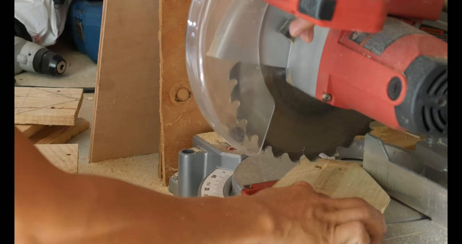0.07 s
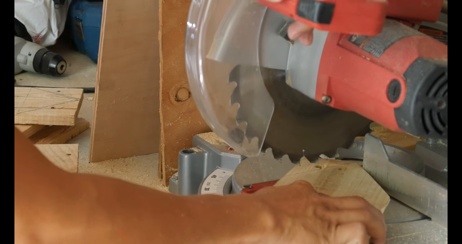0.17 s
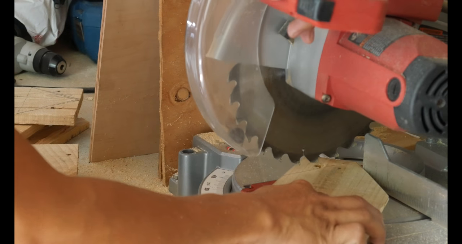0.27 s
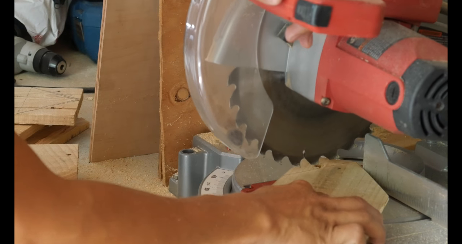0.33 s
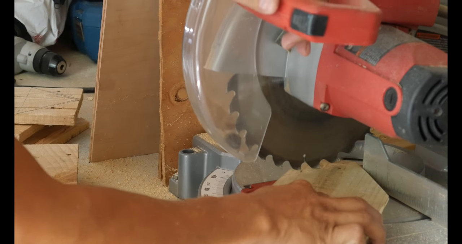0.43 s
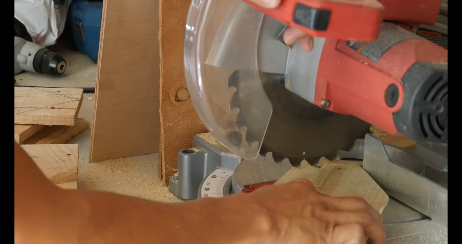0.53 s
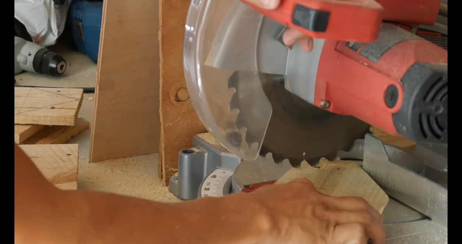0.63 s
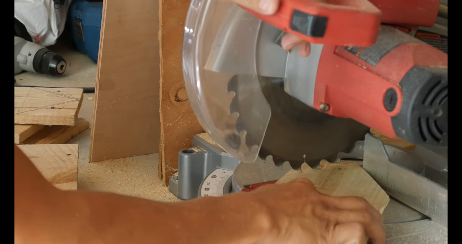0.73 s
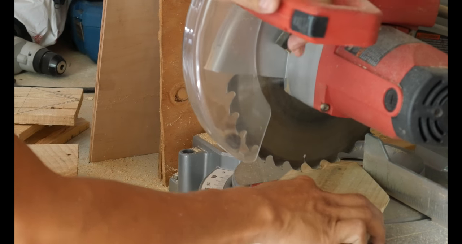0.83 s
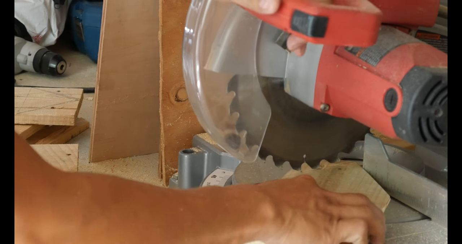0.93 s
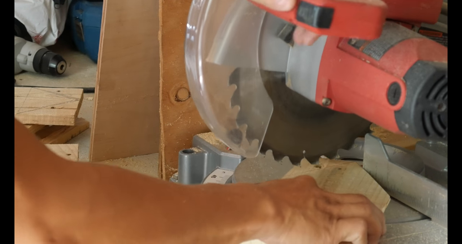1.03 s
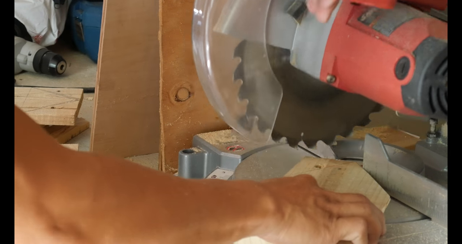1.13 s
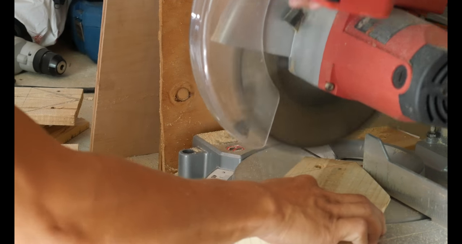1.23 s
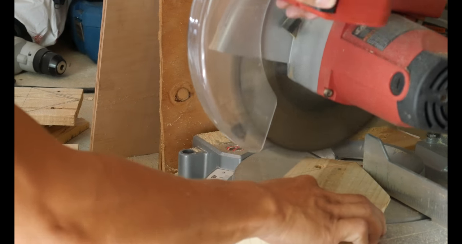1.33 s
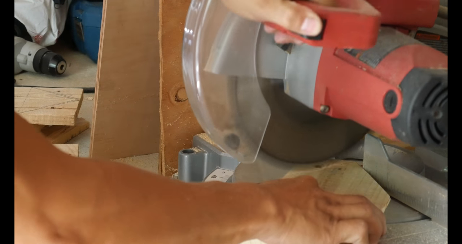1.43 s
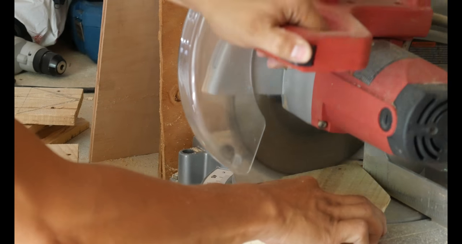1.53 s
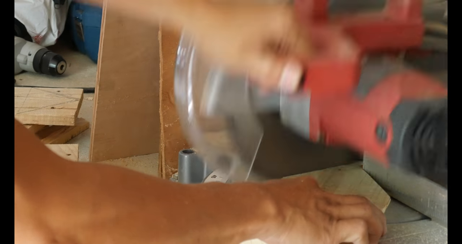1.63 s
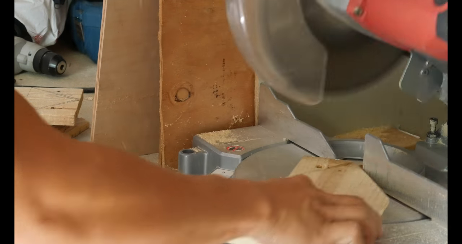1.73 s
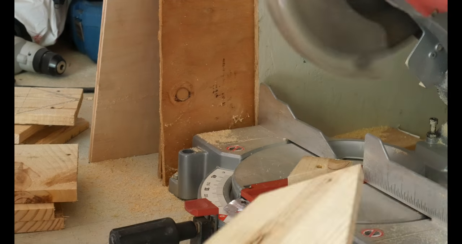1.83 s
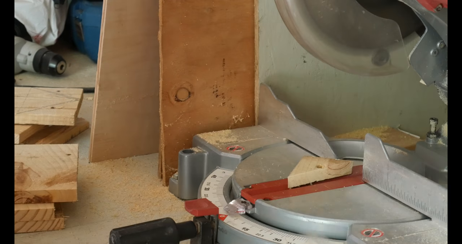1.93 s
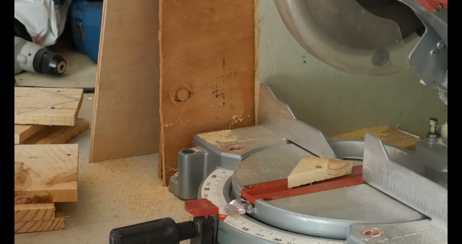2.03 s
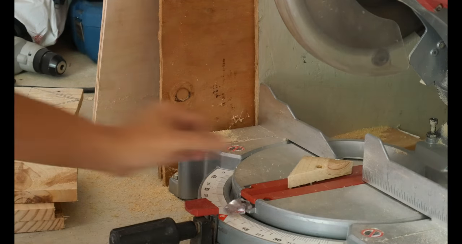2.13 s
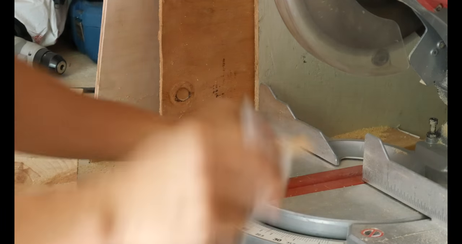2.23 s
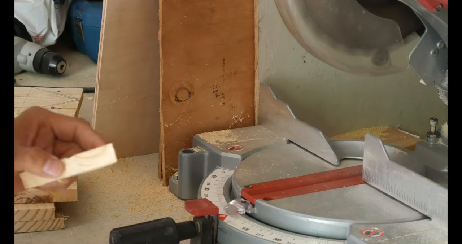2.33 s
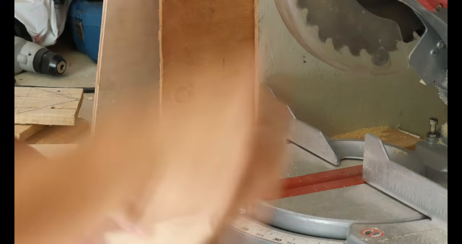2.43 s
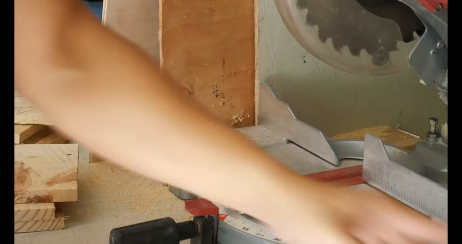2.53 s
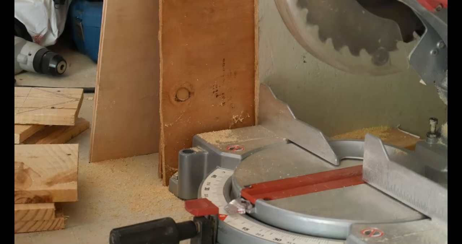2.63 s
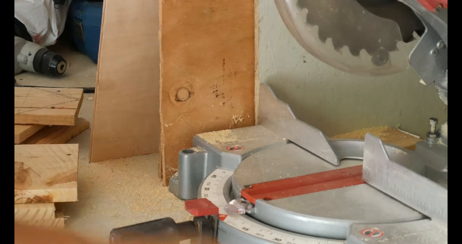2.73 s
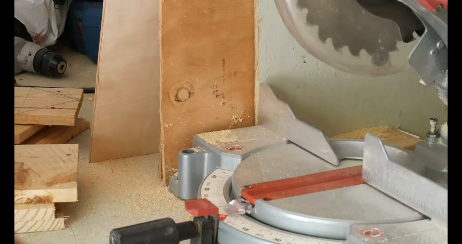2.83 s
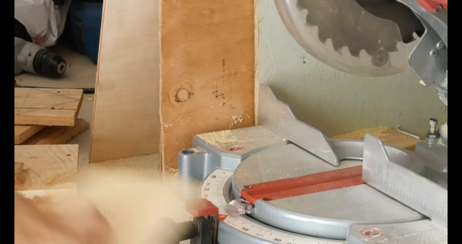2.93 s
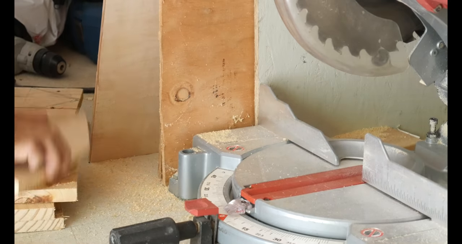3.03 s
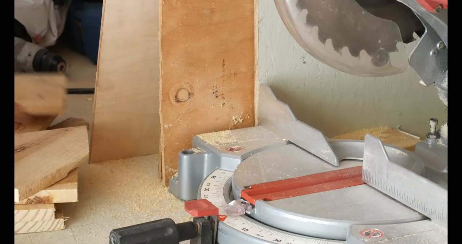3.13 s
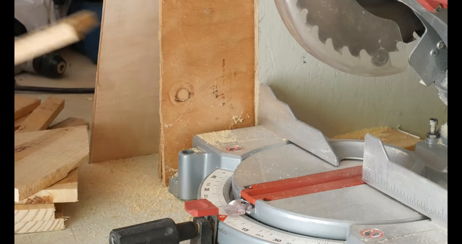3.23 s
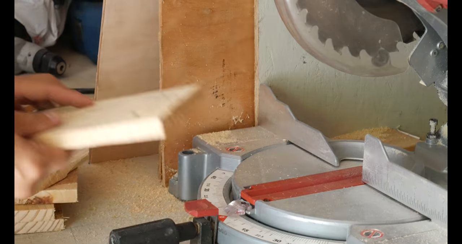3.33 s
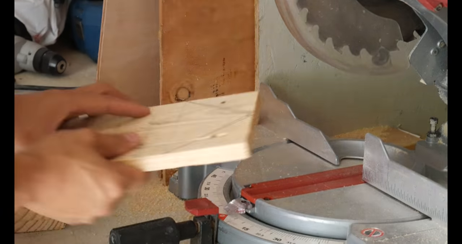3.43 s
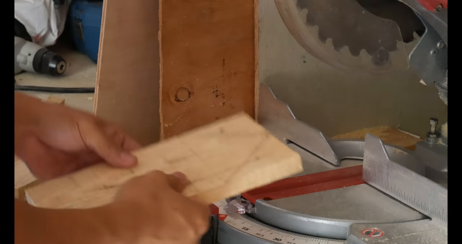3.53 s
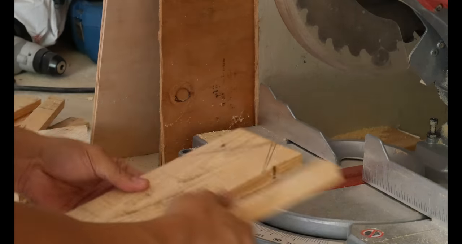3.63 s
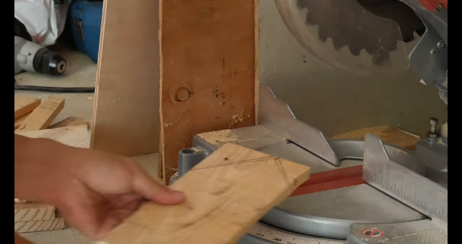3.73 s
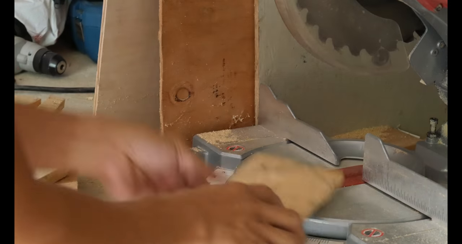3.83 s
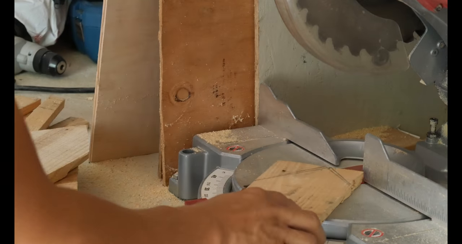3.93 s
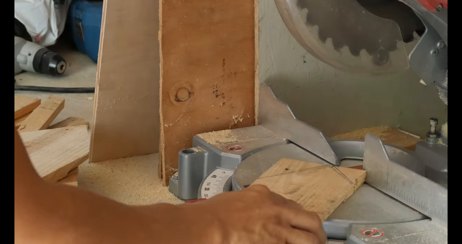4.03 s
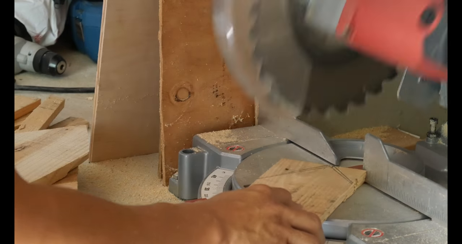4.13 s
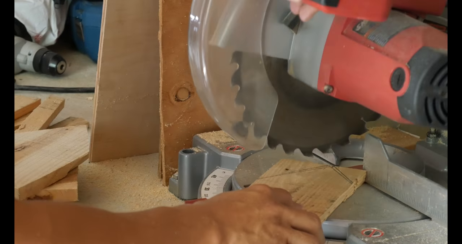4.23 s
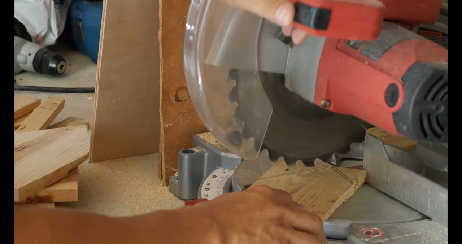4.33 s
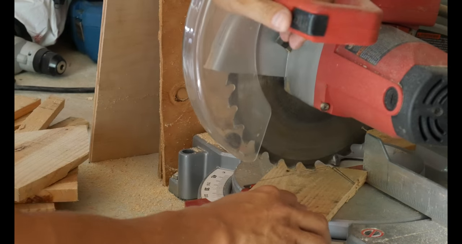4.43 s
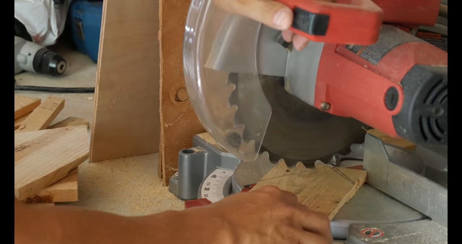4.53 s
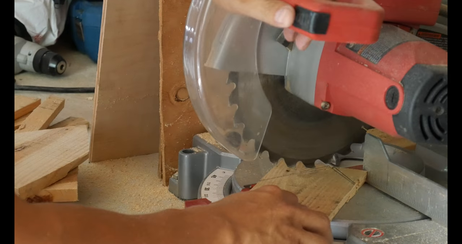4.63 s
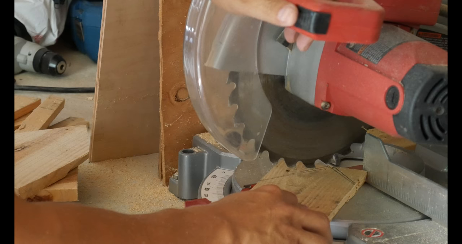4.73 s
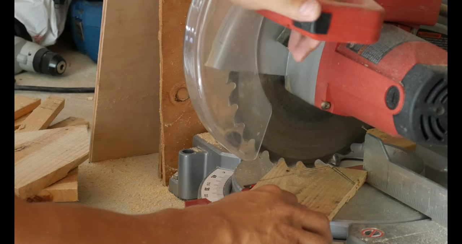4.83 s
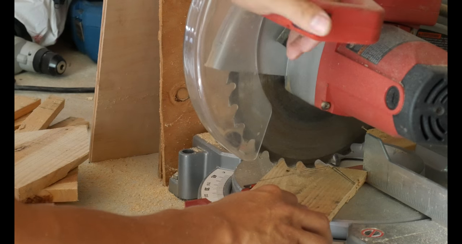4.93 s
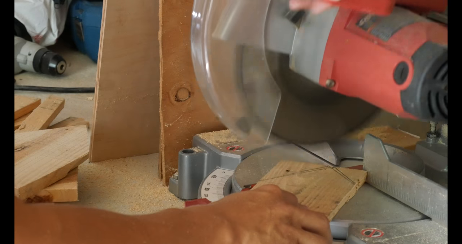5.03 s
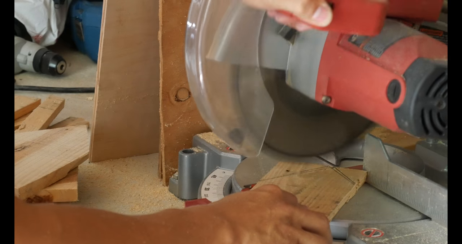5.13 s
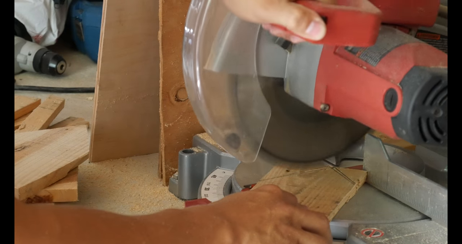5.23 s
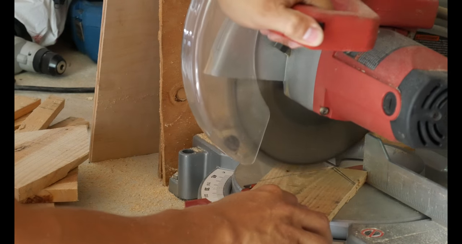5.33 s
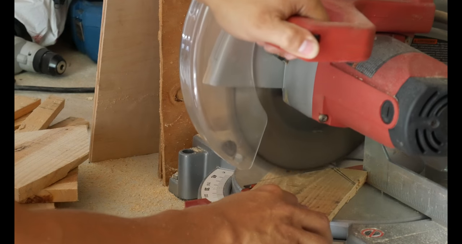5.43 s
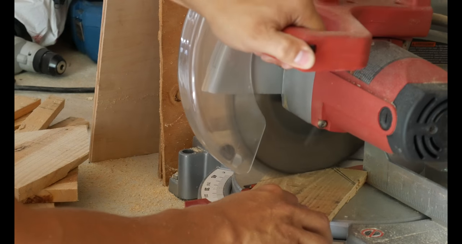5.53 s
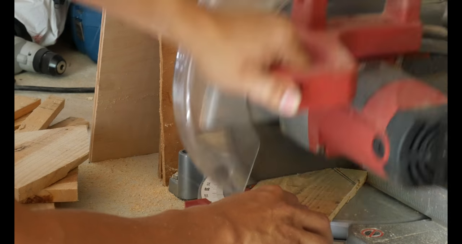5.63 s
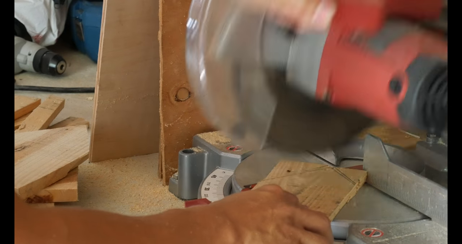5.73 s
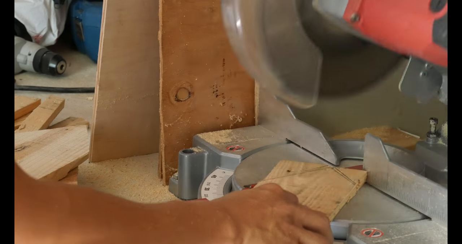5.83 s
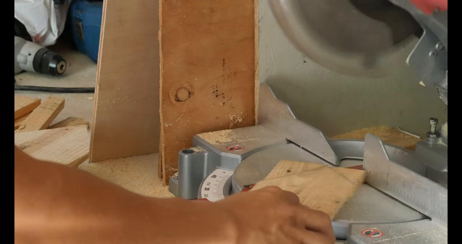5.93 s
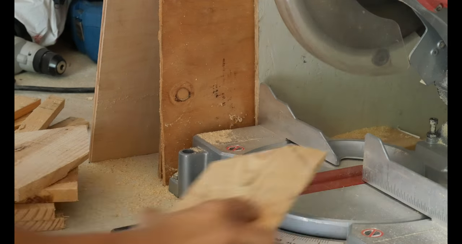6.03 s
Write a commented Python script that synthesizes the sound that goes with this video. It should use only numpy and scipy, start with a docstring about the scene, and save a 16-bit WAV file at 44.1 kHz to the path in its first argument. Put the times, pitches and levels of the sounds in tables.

```python
"""A faint far whine calls twice over a low, restless workshop background, then a mitre saw makes two quick cuts.
Its motor kicks in with a mains growl, gears rattle and whine, the teeth bite and slow it, and it runs down.
After the first cut the blade rings in decaying sine modes; boards, mostly between the cuts, slide as
stick-slip noise and knock as struck resonances. A close, nearly mono microphone in a small, fairly dry room."""
import sys
import numpy as np
from scipy import signal
from scipy.fft import rfft, irfft
from scipy.io import wavfile
from scipy.ndimage import uniform_filter1d

SR = 44100
rng = np.random.default_rng(int(sys.argv[2]) if len(sys.argv) > 2 else 0)


def bounce(signal):
    """Save signal as a 16-bit WAV file at the path given by the first command-line argument."""
    frames = np.transpose(np.atleast_2d(signal))
    limited = np.clip(frames, -1, 1)
    pcm = np.round(limited * 32767).astype(np.int16)
    wavfile.write(sys.argv[1], SR, pcm)


N = 268613
TIME = np.arange(N) / SR  # s
FREQ = np.maximum(np.arange(N // 2 + 1) * SR / N, 1)  # Hz


def undb(db):
    """Decibels are logarithmic: convert a level to an amplitude ratio."""
    return 10 ** (np.asarray(db) / 20)


def unit(x):
    """Normalise the mean power: scale to rms 1."""
    return x / np.sqrt(np.mean(x ** 2) + 1e-20)


def noise():
    """White noise: equal mean power at every frequency."""
    return rng.standard_normal(N)


def walk(rate):
    """Slow random modulation: rate chance values a second, joined by lines, with a spread near 1."""
    return np.interp(TIME * rate, np.arange(N // 8), rng.standard_normal(N // 8)) * 1.3


def shape(points):
    """Spectral envelope: gain through (Hz, dB) points, falling steeply outside them."""
    hz, db = np.transpose(points)
    skirts = np.minimum(FREQ / hz[0], 1) ** 4 * np.minimum(hz[-1] / FREQ, 1) ** 4
    return undb(np.interp(np.log(FREQ), np.log(hz), db)) * skirts


def resonances(rows):
    """Modal response: the powers of steep-sided resonances (Hz, width Hz, dB) add up."""
    powers = (undb(db) ** 2 / (1 + ((FREQ - hz) / width) ** 2) ** 2 for hz, width, db in rows)
    return np.sqrt(sum(powers))


def band(lo_hz, hi_hz):
    """Band-pass: gain with steep sides at both limits."""
    return 1 / np.sqrt((1 + (lo_hz / FREQ) ** 10) * (1 + (FREQ / hi_hz) ** 10))


def colour(x, gain):
    """Linear filtering: multiply the spectrum by a gain, then scale to rms 1."""
    return unit(irfft(rfft(x) * gain, N))


def steady(x, size=2600):
    """Envelope division: even out the slow level and keep the grain."""
    return x / np.sqrt(np.abs(uniform_filter1d(x ** 2, size)) + 1e-4)


def gate(start, end, edge_s):
    """Linear envelope: fades in from start and out from end."""
    return np.clip((TIME - start) / edge_s, 0, 1) * np.clip((end - TIME) / edge_s + 1, 0, 1)


def ring(s, t60, attack_s, hold_s=0):
    """Exponential decay: rises quickly at one moment, holds and dies away by 60 dB in t60."""
    age = np.maximum(TIME - s, 0)
    return np.minimum(age / attack_s, 1) * undb(-60 * np.maximum(age - hold_s, 0) / t60)


def stroke(s, half):
    """Gaussian envelope: a smooth bell of gain around one moment."""
    return np.exp(-.5 * np.minimum(((TIME - s) / half) ** 2, 100))


def strikes(turns, scatter_db, uneven_db, count):
    """Periodic impacts: one blow per wheel tooth; each tooth has its own strength, each blow its own luck."""
    tooth = np.floor(turns * count).astype(int)
    at = np.flatnonzero(np.diff(tooth)) + 1
    tooth_db = uneven_db * rng.standard_normal(count)[tooth[at] % count]
    size = undb(tooth_db + scatter_db * noise()[at])
    # place each click between samples with a windowed sinc
    early = (turns[at] * count - tooth[at]) / (count * (turns[at] - turns[at - 1]))
    taps = np.arange(-6, 7)[:, None]
    click = np.sinc(taps + early) * np.cos(np.pi * (taps + early) / len(taps) / 1.1) ** 2
    return np.bincount(np.clip(at + taps, 0, N - 1).ravel(), (size * click).ravel(), N)


# background spectrum: frequency_hz, density_db
SHOP_SPECTRUM = [(15, -49.5), (25, -23), (70, -9.5), (104, 3), (174, -7), (248, -2.5), (342, -4),
                 (690, -10.5), (928, -7), (1030, -10), (1280, -14.5), (2090, -24.5), (3580, -29),
                 (4210, -36), (15800, -48.5)]
# background level before the split into two bands: time_s, level_db
SHOP_LEVEL = [(0, -50.5), (1.1, -49.5), (2.45, -49), (2.68, -55), (3.6, -51.5), (4.05, -48), (4.6, -55),
              (5.0, -52)]
# partials of the far whine: pitch_hz, relative_level_db
FAR_TONES = [(866.7, -1.5), (1190, -16), (1513, -22)]
# calls of the far whine: start_s, end_s, level_db
FAR_CALLS = [(-.03, .115, -46.5), (0.245, 0.506, -53.5)]


def shop():
    """Filtered noise in two wavering bands makes the background; a sum of partials makes the far whine."""
    low = colour(noise(), shape(SHOP_SPECTRUM) * band(24, 500)) * undb(-6.5 + 0.57 * walk(10))
    high = colour(noise(), shape(SHOP_SPECTRUM) * band(460, 16000)) * undb(-5.5 + .8 * walk(6))
    far = sum(undb(db + 0.47 * walk(14)) * np.sin(2 * np.pi * hz * TIME) for hz, db in FAR_TONES)
    calls = sum(undb(db) * gate(start, end, edge_s=.025) for start, end, db in FAR_CALLS)
    return (low + high) * undb(np.interp(TIME, *np.transpose(SHOP_LEVEL))) + np.sqrt(2) * calls * far


# boards and hands sliding: middle_s, half_length_s, body_db, grit_db
SLIDES = [(1.168, .044, -53.5, -64.5), (2.175, 0.0063, -47, -39.5), (2.411, .008, -57, -49),
          (2.472, 0.032, -47, -44), (2.49, 0.0073, -41.5, -45.5), (2.857, 0.0065, -42.5, -76),
          (2.888, 0.014, -36.5, -45.5), (2.964, 0.011, -37, -48), (3.025, 0.015, -53, -46.5),
          (3.117, 0.0081, -36.5, -55), (3.193, 0.013, -51, -64.5), (3.528, 0.014, -68, -57),
          (3.97, 0.016, -59, -63), (4.068, 0.0071, -44, -50), (4.149, 0.0099, -37.5, -39.5),
          (4.204, 0.017, -44, -54.5), (4.928, 0.077, -61.5, -66.5)]
# scraping spectrum: frequency_hz, density_db
SCRAPE = [(71, -50), (120, 1.5), (354, 4.5), (452, 6.5), (785, 10.5), (924, -2), (1070, 9), (1540, -5.5),
          (2510, -12), (4540, -21), (7110, -31.5), (14000, -37.5), (15800, -48)]
# thin squeaks: middle_s, half_length_s, pitch_hz, width_hz, level_db
SQUEAKS = [(2.475, .035, 14000, 380, -71), (3.716, 0.009, 2800, 300, -55), (4.295, .016, 1010, 110, -52),
           (4.431, 0.0072, 360, 120, -50.5), (4.659, 0.013, 3560, 400, -61)]


def slides(grain_db=2.0):
    """Stick-slip friction: wood catches and slips on the dusty table, now and then with a squeak."""
    slips = noise() * undb(grain_db * walk(500))
    body = colour(slips, shape(SCRAPE) * band(110, 1900))
    grit = colour(slips, shape(SCRAPE) * band(2060, 13400))
    out = np.zeros(N)
    for s, half, body_db, grit_db in SLIDES:
        out += stroke(s, half) * (undb(body_db) * body + undb(grit_db) * grit)
    for s, half, hz, width, db in SQUEAKS:
        out += stroke(s, half) * undb(db) * colour(slips, resonances([(hz, width, 0)]))
    return out


# the two cuts: trigger_pulled_s, teeth_enter_s, teeth_through_s, trigger_released_s, chips_db, blade_hum_db
CUTS = [(1.222, 1.495, 1.626, 1.775, -29.5, -45), (5.079, 5.281, 5.708, 5.845, -35, -34)]
FREE_HZ, SAG = 325.75, .29  # free shaft speed; share of speed lost at full bite
SPIN_UP_S, BRAKE_S, STOP_S = .122, .232, .72  # two time constants; release to the final fade of the speed


def motor(on, enter, through, off):
    """First-order rotor inertia: drive, bite and share of free speed as it spins up, sags and brakes."""
    drive = gate(on, off, edge_s=0.015)
    # the bite grows as the teeth go deeper
    bite = np.clip((TIME - enter) / (through - enter), 0, 1) * gate(enter, through, edge_s=.018)
    step = 1 / (SPIN_UP_S * SR)
    spin = signal.lfilter([step], [1, step - 1], (TIME > on) * (1 - SAG * bite))
    braking = np.interp(off, TIME, spin) * np.exp(-np.maximum(TIME - off, 0) / BRAKE_S)
    return drive, bite, np.where(TIME < off, spin, braking * gate(on, off + STOP_S, edge_s=.05))


MAINS_PHASE = 2 * np.pi * 120 * TIME  # twice the mains frequency
INRUSH_DB, INRUSH_S, RUNNING_DB = -27.5, .058, -54.5  # surge peak, its lag after the trigger, running level
INRUSH_RISE_DB_PER_S, INRUSH_FALL_DB_PER_S = 400, 199.5


def mains_growl(drive):
    """Magnetic force goes as current squared: coils growl at twice the mains, swelling with the inrush."""
    ages = [TIME - on - INRUSH_S for on, *_ in CUTS]
    swells = [np.minimum(INRUSH_RISE_DB_PER_S * age, -INRUSH_FALL_DB_PER_S * age) for age in ages]
    surge = sum(undb(INRUSH_DB + swell) for swell in swells)
    strength = drive * np.hypot(surge, undb(RUNNING_DB))
    return strength * np.sqrt(2) * np.sin(MAINS_PHASE + .3 * walk(25))


def gear_clatter(turns):
    """Backlash impacts: gear teeth hit either flank at random, harder at each peak of the mains torque."""
    torque = 1 + .08 * np.sin(MAINS_PHASE)
    blows = strikes(turns, scatter_db=5.0, uneven_db=4.0, count=12) * np.sign(noise())
    return steady(blows) * torque + noise()


def drone(turns, count=26):
    """Harmonic series of a rotor uneven once a turn: shaft multiples that each waver on their own."""
    multiples = range(1, count)
    return unit(sum((1 + .6 * walk(22)) * np.sin(2 * np.pi * (k * turns + rng.random())) for k in multiples))


# frame resonances: centre_hz, width_hz, gain_db
FRAME = [(268.4, 17, -7), (379, 55, -11), (480, 59, -3.5), (769, 81, 2.5), (974, 93, 2), (1170, 53, -4),
         (1300, 36, 0.5), (1420, 17, -7), (1530, 75, -11.5), (1600, 17, -19.5), (1970, 68, -15.5)]
# gearbox resonances: centre_hz, width_hz, gain_db
GEARBOX = [(2315, 120, -0.5), (2610, 230, -4.5), (2750, 31, -6), (3135, 110, -3), (3600, 48, -8),
           (3884, 56, -10), (3966, 77, -10), (4360, 43, -13), (4450, 141, -18.5), (4760, 37, -11)]
# levels at full speed, and how bite and loss of drive change them
FRAME_DB, FRAME_BITE_DB, FRAME_COAST_DB = -28.5, -6, 1.9
GEARS_DB, GEARS_COAST_DB, GEARS_START_DB = -27.18, -4, -4  # START: driven, from standstill
FRAME_LAW, GEARS_LAW = 1.31, 1.05  # the amplitude follows this power of the effort


def housing(turns, shake, drive, bite, spin):
    """Forced modal vibration: the shake rings frame and gearbox; imbalance hums at the shaft rate."""
    effort = np.maximum(drive, spin)
    coast = 1 - drive
    frame = effort ** FRAME_LAW * undb(FRAME_DB + FRAME_BITE_DB * bite + FRAME_COAST_DB * coast)
    gears_db = GEARS_DB + GEARS_COAST_DB * coast + GEARS_START_DB * drive * (1 - spin)
    gears = effort ** GEARS_LAW * undb(gears_db)
    out = frame * colour(shake, resonances(FRAME) + undb(-12) * band(330, 1900))
    out += gears * colour(shake, resonances(GEARBOX) + undb(-13.5) * band(2200, 3940))
    return out + gears * undb(-33.32) * spin ** 4 * np.sin(2 * np.pi * turns)


KICK_DB, KICK_LAG_S = -18, .01  # the gears slam together just after the trigger is pulled


def kicks(t60=0.15):
    """Impulsive excitation: the starting torque takes up the gear lash with a jolt that rings the frame."""
    jolt = undb(KICK_DB) * sum(ring(on + KICK_LAG_S, t60, attack_s=0.0081) for on, *_ in CUTS)
    return jolt * colour(noise(), resonances(FRAME) + undb(-4.0) * resonances(GEARBOX))


# motor whine, 6 being the tooth rate and 12 the gear mesh: shaft_multiple, driven_db, coasting_db
WHINE = [(6, -8, -9.5), (12, -3, -9.5), (16, -19, -2), (20, -19.5, -9), (24, -9, -7), (36, -15, -11.5),
         (48, -22.5, -9), (60, -22.5, -8.5)]
# how well the casing radiates the whine: frequency_hz, gain_db
CASING = [(700, -44), (1600, -3), (2300, -5), (3100, -1), (3650, -2.5), (4400, -3.5)]
WHINE_DB = -26  # on top of the tones' own levels


def whine(turns, drive, spin):
    """Gear-mesh tones track shaft speed, loudest where they pass the casing's resonance, roughened by random
    wavering."""
    # without drive the gears run slack, which smears the tones and brings out the upper multiples
    tones = np.zeros(N)
    for k, driven_db, coasting_db in WHINE:
        shake = .6 + .25 * drive + .45 * (walk(220) + 1j * walk(220))
        shake = shake * undb(3.2 * walk(30))
        gain = undb(driven_db * drive + coasting_db * (1 - drive))
        tones += gain * np.real(shake * np.exp(2j * np.pi * k * turns))
    radiated = irfft(rfft(tones) * shape(CASING) * band(600, 5200), N)
    return undb(WHINE_DB) * spin * radiated


# fan air spectrum: frequency_hz, density_db
AIR = [(2650, -16), (4500, -12.5), (4870, -1), (5380, -7.5), (5760, -6), (6700, -9), (8140, -11),
       (9190, -7.5), (9940, -15.5), (11000, -15), (12900, -22), (14700, -26), (15800, -40)]
FAN_DB, FAN_LAW = -38.5, 1.61  # level at full speed; power of the speed


def fan(turns, clatter, drive, spin):
    """Turbulent flow noise: the hiss grows with speed and pulses once per blade turn."""
    air = colour(noise() * (1 + 0.3 * np.sin(np.pi * turns / 2)) + 0.88 * clatter, shape(AIR))
    strength = spin ** FAN_LAW + 1.1 * drive * (1 - spin) * np.sqrt(spin)
    return undb(FAN_DB) * strength * air


RUMBLE_DB, SHUDDER_DB = -56, -42.5  # under drive; without drive at full speed


def stand(drive, spin):
    """Structure-borne noise: the stand rumbles softly under drive and shudders as the rotor brakes."""
    rumble = drive * undb(RUMBLE_DB) + (1 - drive) * spin ** 1.4 * undb(SHUDDER_DB)
    return rumble * colour(noise(), band(77, 230))


# chip spectrum: frequency_hz, density_db
CHIPS = [(2650, -24), (4500, -28.5), (5130, 7), (5580, -7.5), (6070, -4), (6230, -4.5), (6880, 5),
         (7770, -5.5), (9380, -6.5), (10000, -6), (11200, -3.5), (15200, -15), (15800, -38.5)]
# cutting resonances: centre_hz, width_hz, gain_db
CUTTING = [(5150, 170, -6), (5544, 92, -9), (5940, 178, 8), (6260, 113, -6), (6503, 62, -4.5),
           (6240, 199, -13), (8030, 280, -6.5), (8484, 202, -32.5), (8850, 212, -12)]


def cutting(turns, stack, bite):
    """Periodic fracture: blade teeth tear chips from both walls of the kerf, unevenly, every turn."""
    # the blade turns at a quarter of the shaft speed
    left, right = (strikes(turns / 4, scatter_db=1.2, uneven_db=3, count=24) for _ in range(2))
    tearing = steady(left - right) * (1 + .4 * noise()) + .5 * noise() + .15 * stack
    chips = steady(colour(tearing, shape(CHIPS) * (1 + 0.83 * resonances(CUTTING))))
    hum = colour(noise(), resonances([(2255, 19, 0)]))
    out = np.zeros(N)
    for on, _, _, off, chips_db, hum_db in CUTS:
        out += gate(on, off, edge_s=.01) * bite ** .2 * (undb(chips_db) * chips + undb(hum_db) * hum)
    return out


def saw(drive, bite, spin):
    """Common excitation: one shaft angle times clatter, whine, fan and cutting; the growl keeps to the mains."""
    turns = np.cumsum(FREE_HZ * spin * (1 + .002 * walk(60))) / SR
    clatter = gear_clatter(turns)
    stack = drone(turns)
    # under load the shaft's own multiples stand out of the clatter
    shake = steady(clatter + (.25 + .5 * bite) * stack)
    out = mains_growl(drive) + housing(turns, shake, drive, bite, spin) + whine(turns, drive, spin)
    return out + fan(turns, clatter, drive, spin) + stand(drive, spin) + cutting(turns, stack, bite)


# leaving the wood, braking, stopping: start_s, main_ring_db, main_hold_s, main_t60_s, low_modes_db
RINGS = [(1.602, -29.5, 0.1, 0.54, -68), (1.923, -43, 0.07, 0.92, -59), (2.512, -61, .02, 1.4, -52.5)]
# the blade's two low modes: pitch_hz, relative_level_db, t60_s
BLADE_MODES = [(1816, -2, 2.5), (2000, 4.5, 1.15)]
SING_HZ, STIFFEN_HZ = 3940, 440  # main ring at rest; its rise at full spin


def blade(spin):
    """Centrifugal stiffening: the steel plate sings sharp and fluttering in spin, more evenly at rest."""
    flutter_hz = 18 * spin * walk(120)
    phase = 2 * np.pi * np.cumsum(SING_HZ + STIFFEN_HZ * spin ** 2 + flutter_hz) / SR
    sing = undb(3 * np.sqrt(spin) * walk(70) + 1.5 * walk(20)) * np.sin(phase)
    out = sing * sum(undb(db) * ring(s, t60, attack_s=.022, hold_s=hold) for s, db, hold, t60, _ in RINGS)
    for hz, mode_db, t60 in BLADE_MODES:
        struck = sum(undb(low_db) * ring(s, t60, attack_s=.018) for s, *_, low_db in RINGS)
        out += struck * undb(mode_db + 2.6 * walk(25)) * np.sin(2 * np.pi * hz * TIME)
    return np.sqrt(2) * out


# wood knocks: start_s, strength_db, extra_thud_db, hardness_db
KNOCKS = [(2.077, -28.5, 0.5, -7), (2.088, -33.5, 1.5, -6), (2.617, -36, -1, 7.5), (2.625, -33, -7.5, 4),
          (2.637, -41, 0, 8), (2.659, -51, 6.5, -4), (2.874, -47, 9, 7), (2.906, -30.5, 1.5, -3),
          (3.006, -50, 0, 6), (3.116, -27.5, -14.5, -2), (3.126, -27.5, -15, -7.5), (3.145, -42, -1.5, -7),
          (3.788, -36.5, 11.5, 2), (3.802, -28, 5, -1), (3.818, -31, -2, 1), (3.836, -34, 1.5, -5),
          (3.912, -32.5, 2.5, -0.5), (3.928, -32.5, 2.5, 0), (4.061, -50, -1, -11), (4.143, -42.5, -11, 7),
          (5.007, -52, -13, 1.5)]
# edges of the thud, clack, crack and tick bands: edge_hz
KNOCK_BANDS_HZ = [70, 700, 1800, 5000, 15800]
# board resonances: centre_hz, width_hz, gain_db
BOARD = [(342, 49, -6.5), (577, 33, -17.5), (1120, 66, -6), (1375, 46, -7.5), (1560, 59, -15),
         (1703, 39, -6), (2125, 80, -6), (2420, 32, -9), (2880, 102, -24), (2990, 54, -34), (3330, 76, -39),
         (3460, 99, -39.5), (3780, 41, -21), (4530, 42, -40)]
# the boards' dense ring: frequency_hz, density_db
WOOD = [(85, -22), (120, -7), (170, -13), (240, -12.5), (350, 1.5), (800, 5.5), (1200, 5.5), (1800, -10.5),
        (2600, 5), (3800, -10), (5500, -28.5), (9000, -45), (15800, -54)]
CRACK_DB, TICK_DB = -9.5, -19.5  # upper bands, against the strength of a blow
CLICK_DB = -0.5  # contact click peak, against the loudest band


def knocks(size=8192, dense_db=-8, contact_s=0.0015, snap_s=0.005, snap=2.1):
    """Impact excitation: each blow clicks, then rings the board; place and hardness set its colour."""
    out, t = np.zeros(N + size), np.arange(size) / SR
    bins = np.arange(size // 2 + 1) * SR / size
    wood = resonances(BOARD) + undb(dense_db) * shape(WOOD)
    edges = zip(KNOCK_BANDS_HZ, KNOCK_BANDS_HZ[1:])
    filters = [np.interp(bins, FREQ, wood * band(lo, hi)) for lo, hi in edges]
    # the board rings only after it is hit: minimum phase from the folded cepstrum
    fold = 1 + np.sign(size / 2 - np.arange(size)) * (t > 0)
    filters = [np.exp(rfft(irfft(np.log(gain + 1e-5)) * fold)) for gain in filters]
    click = irfft(sum(filters))
    click = click / np.abs(click).max()
    t60s = [0.091, 0.064, 0.082, 0.055]  # thud, clack, crack, tick
    push = (1 - np.exp(-t / contact_s)) * (1 + snap * np.exp(-t / snap_s))
    first = int(.02 * SR)  # the level of a blow is set over its first 20 ms
    for s, db, thud_db, hard_db in KNOCKS:
        levels = [db + thud_db, db, db + CRACK_DB + hard_db, db + TICK_DB + 2 * hard_db]
        at = int(s * SR)
        out[at:at + size] += undb(max(levels) + CLICK_DB) * click
        for gain, t60, level_db in zip(filters, t60s, levels):
            burst = rng.standard_normal(size) * undb(-60 * t / t60) * push
            blow = irfft(rfft(burst) * gain)
            out[at:at + size] += blow * undb(level_db) / np.std(blow[:first])
    return out[:N]


def room(x, t60=0.064, size=16384):
    """Diffuse reverberation: short, dull reflections from bench and walls, as decaying noise."""
    t = np.arange(size) / SR
    dull = signal.lfilter([1], [1, -.6], rng.standard_normal(size))
    tail = dull * undb(-60 * t / t60) * (t > .004)
    return signal.fftconvolve(x, tail / np.linalg.norm(tail))[:N]


def scene():
    """Superposition: the saw and the boards close by, in a small dry room."""
    drive, bite, spin = np.sum([motor(*cut[:4]) for cut in CUTS], axis=0)
    near = slides() + saw(drive, bite, spin) + kicks() + blade(spin) + knocks()
    mid = shop() + near + undb(-21.0) * room(near)
    # the two channels differ a little, mostly in the treble
    width = undb(-35) + undb(-18.5) * band(5700, 15800)
    side = irfft(rfft(room(near)) * width, N) + undb(-81.5) * noise()
    return np.array([mid + side, mid - side])


def record(dry):
    """Soft saturation rounds the highest peaks; filters drop the deep rumble and cut the top."""
    ceiling, rumble_hz, top_hz = 0.29, 33, 15500
    rounded = ceiling * np.tanh(dry / ceiling)
    lean = signal.sosfilt(signal.butter(2, rumble_hz, "high", fs=SR, output="sos"), rounded)
    return signal.sosfilt(signal.ellip(8, .2, 70, top_hz, fs=SR, output="sos"), lean)


dry = scene()
out = record(dry)
bounce(out)
```